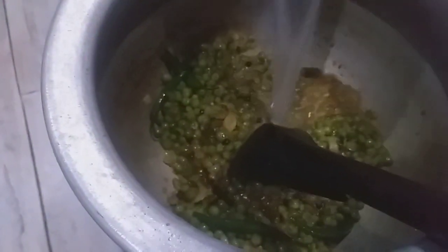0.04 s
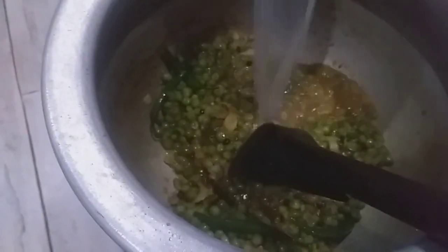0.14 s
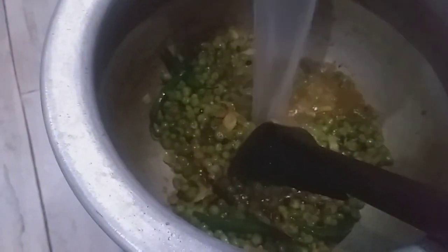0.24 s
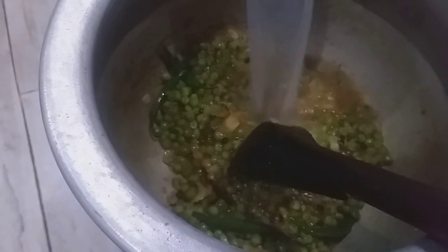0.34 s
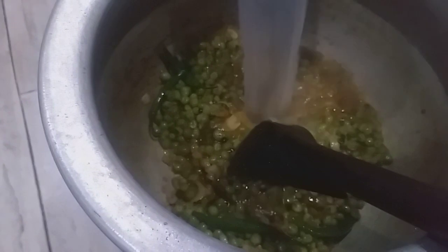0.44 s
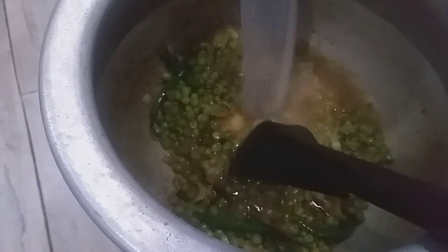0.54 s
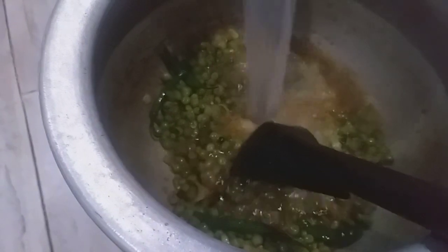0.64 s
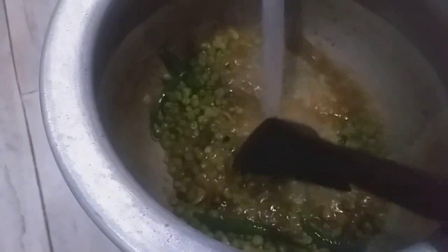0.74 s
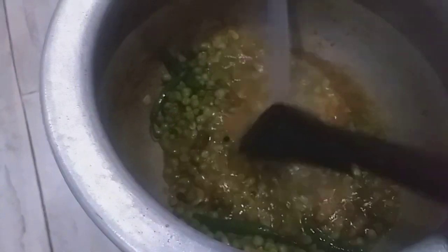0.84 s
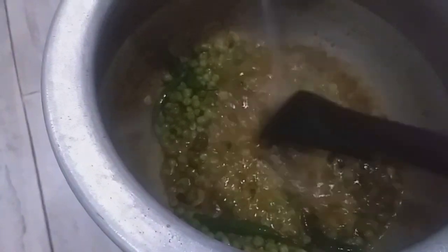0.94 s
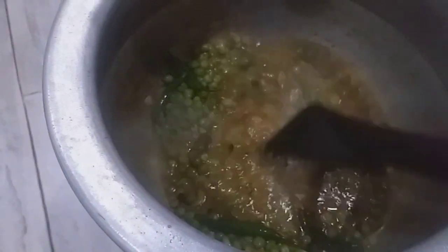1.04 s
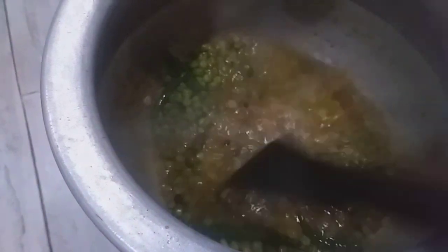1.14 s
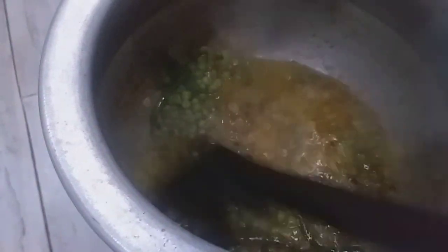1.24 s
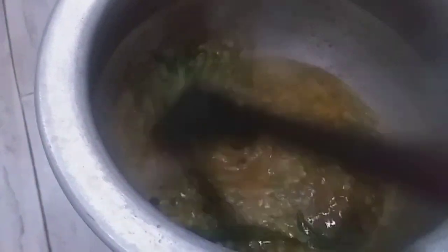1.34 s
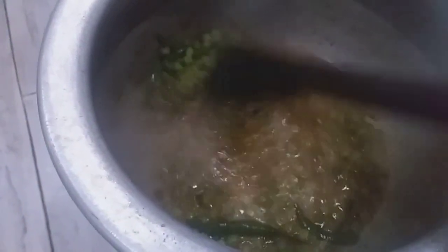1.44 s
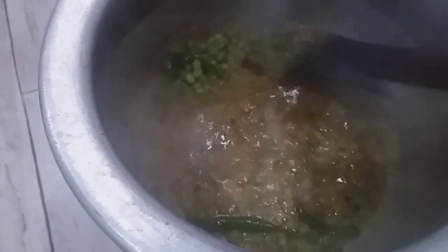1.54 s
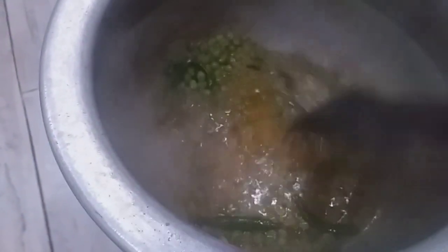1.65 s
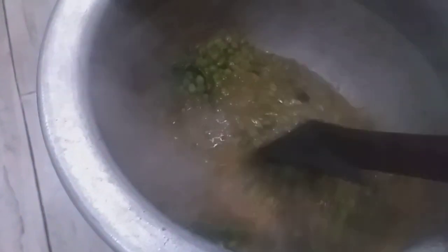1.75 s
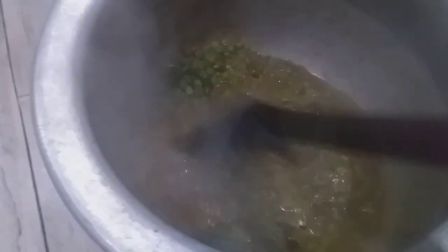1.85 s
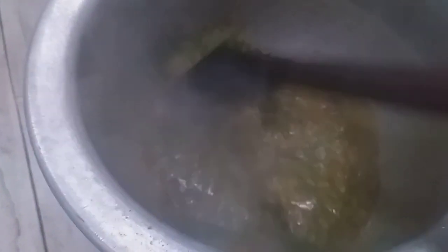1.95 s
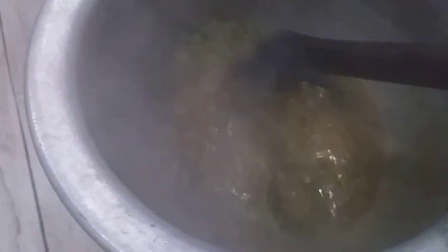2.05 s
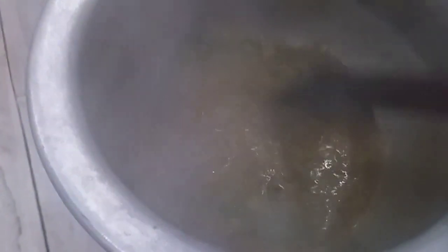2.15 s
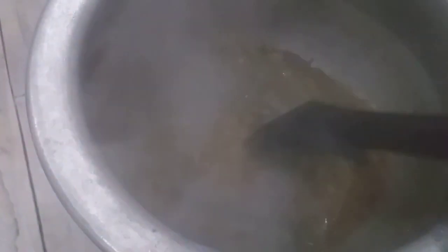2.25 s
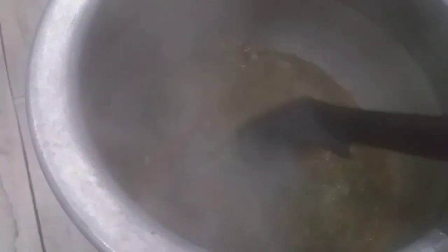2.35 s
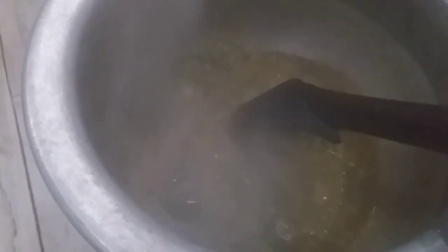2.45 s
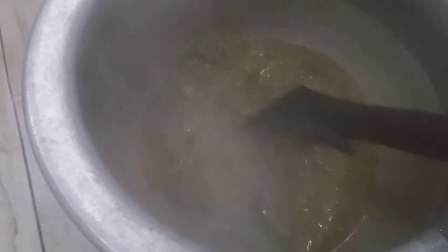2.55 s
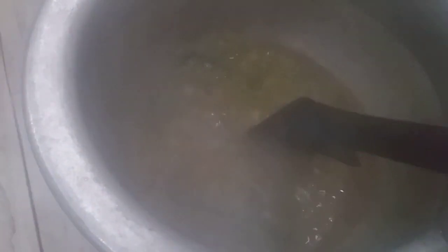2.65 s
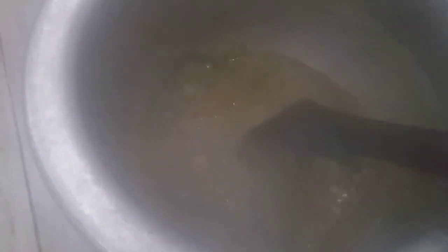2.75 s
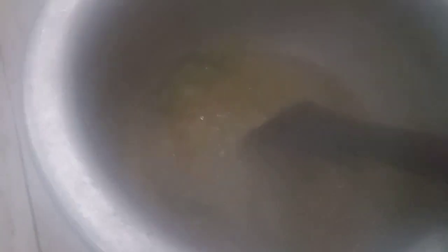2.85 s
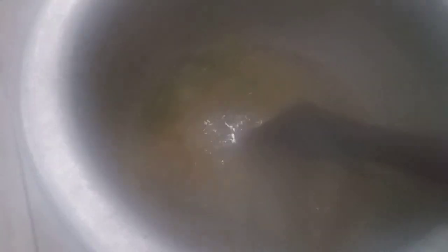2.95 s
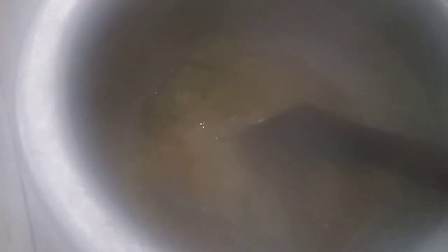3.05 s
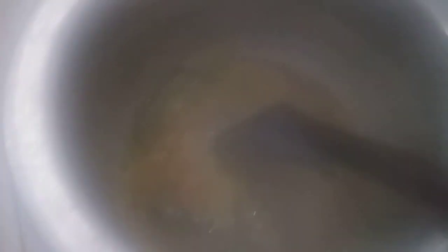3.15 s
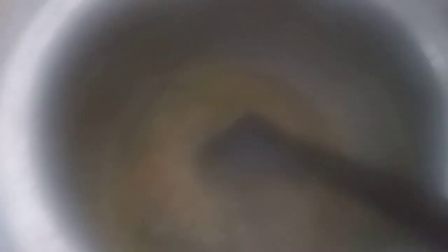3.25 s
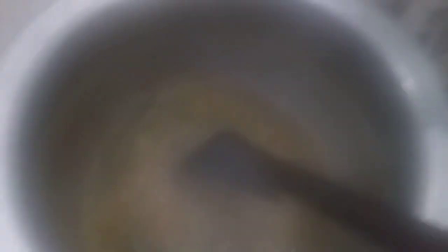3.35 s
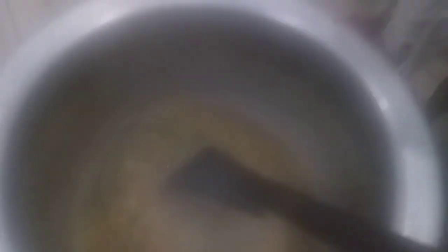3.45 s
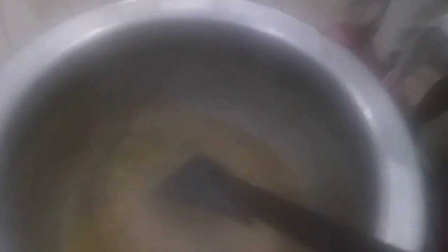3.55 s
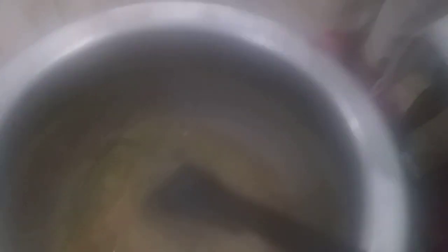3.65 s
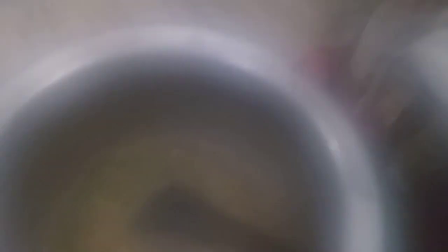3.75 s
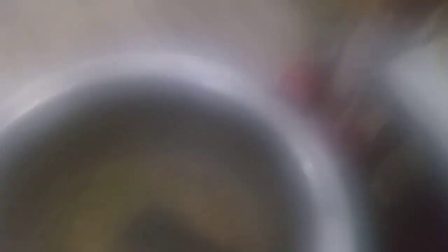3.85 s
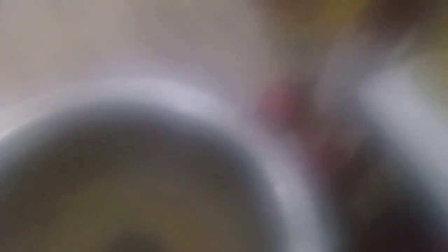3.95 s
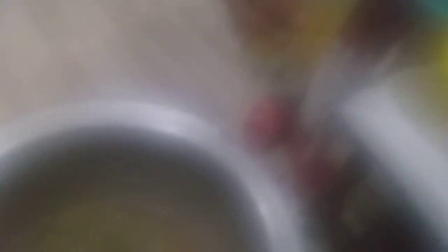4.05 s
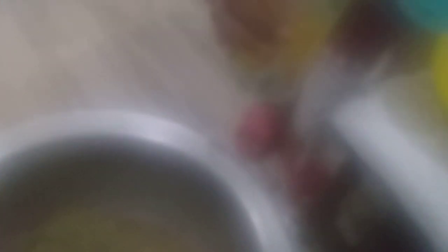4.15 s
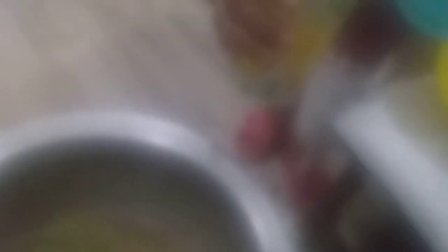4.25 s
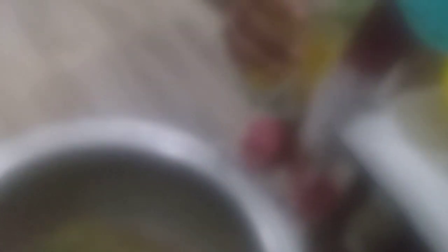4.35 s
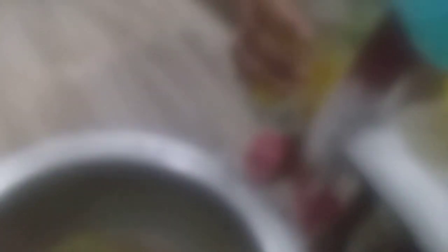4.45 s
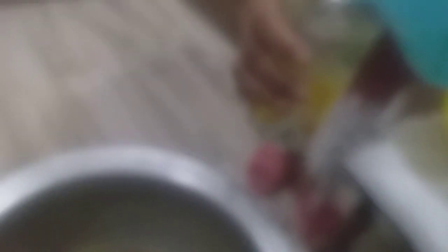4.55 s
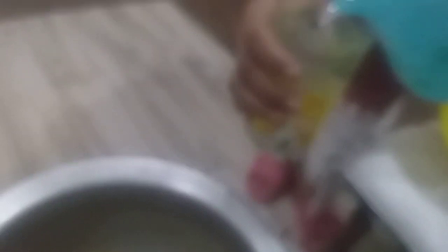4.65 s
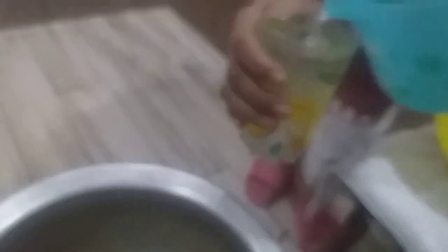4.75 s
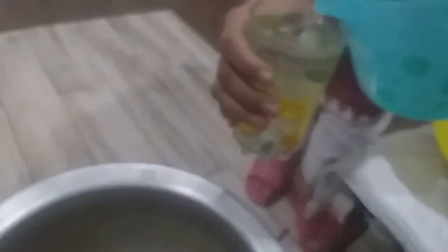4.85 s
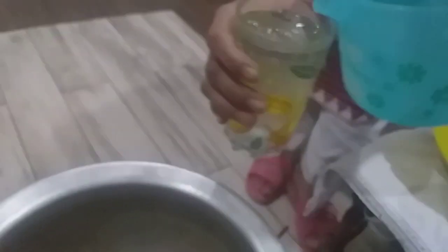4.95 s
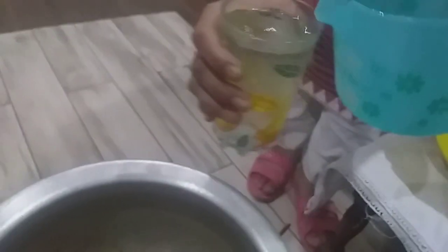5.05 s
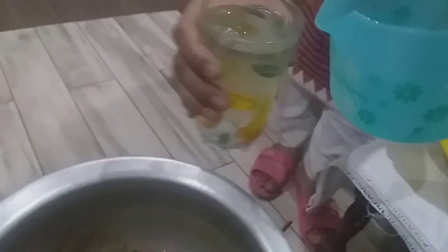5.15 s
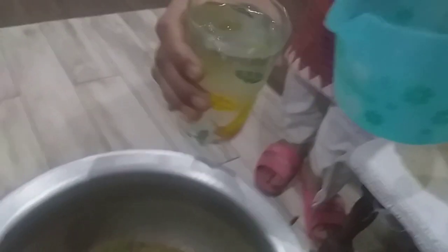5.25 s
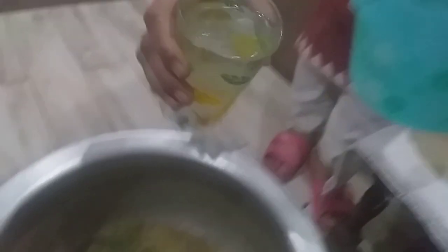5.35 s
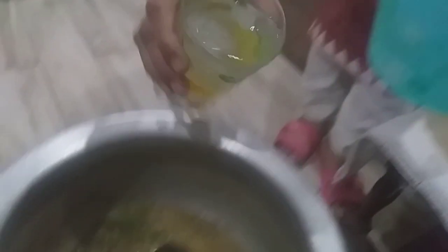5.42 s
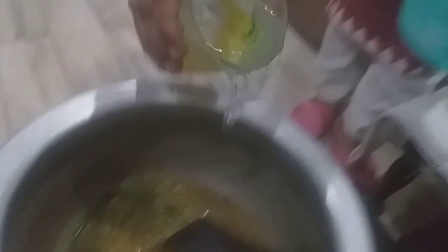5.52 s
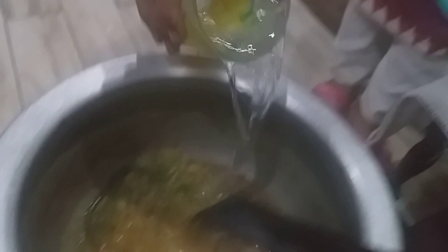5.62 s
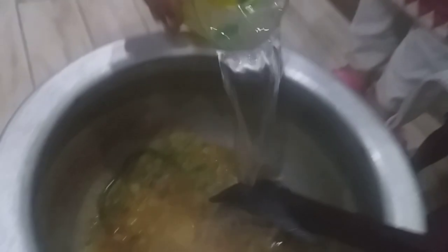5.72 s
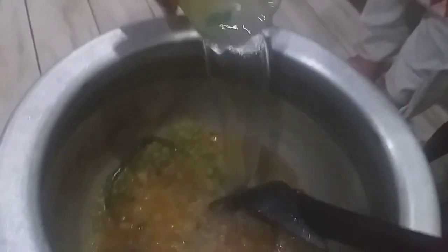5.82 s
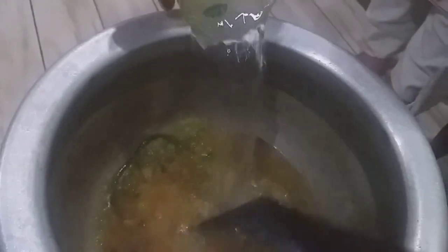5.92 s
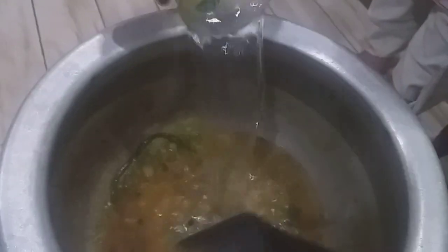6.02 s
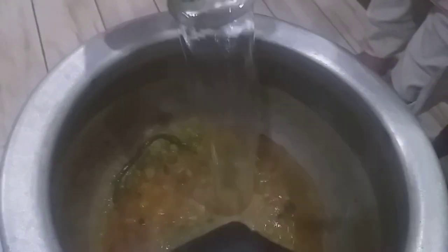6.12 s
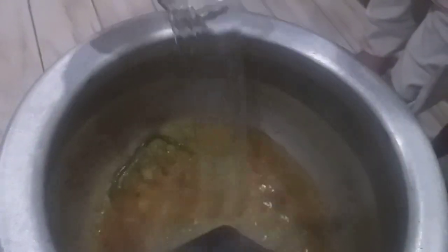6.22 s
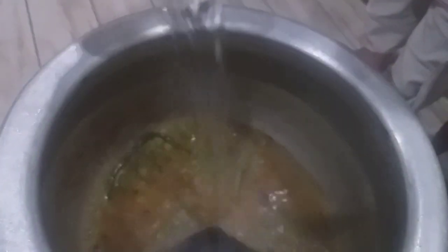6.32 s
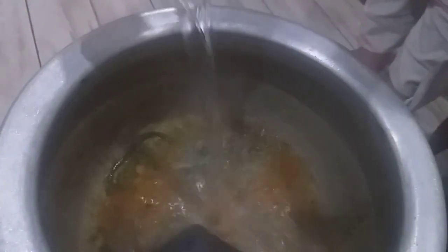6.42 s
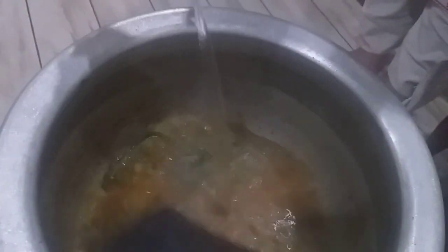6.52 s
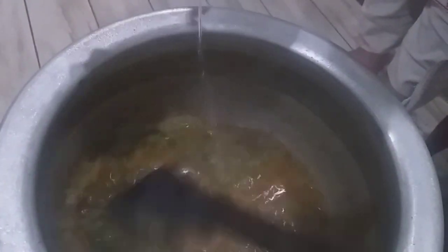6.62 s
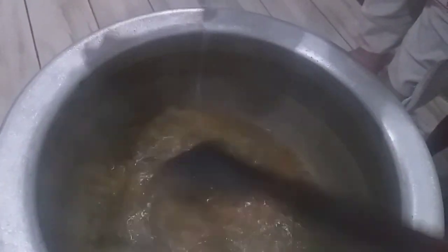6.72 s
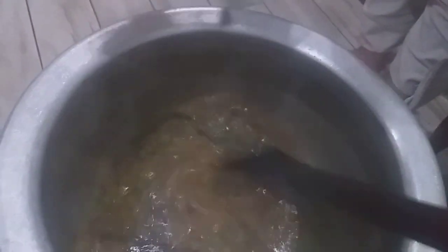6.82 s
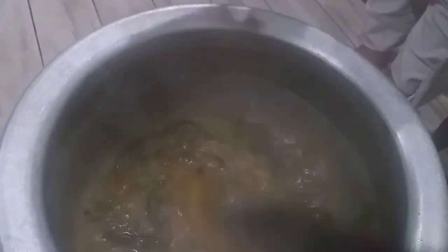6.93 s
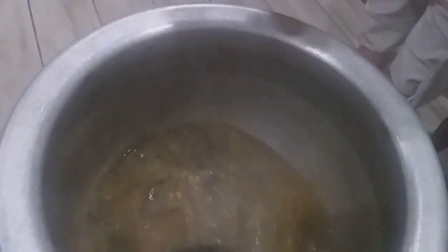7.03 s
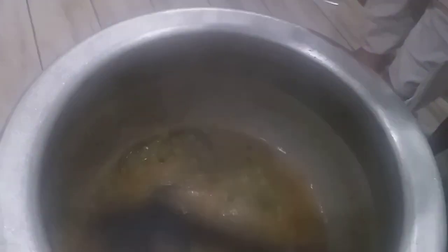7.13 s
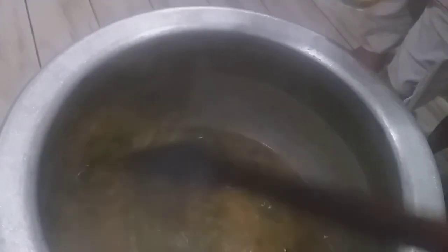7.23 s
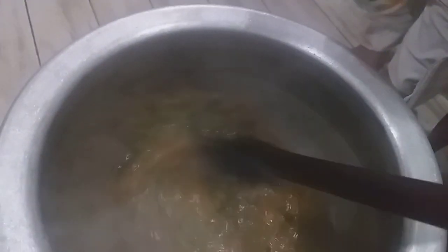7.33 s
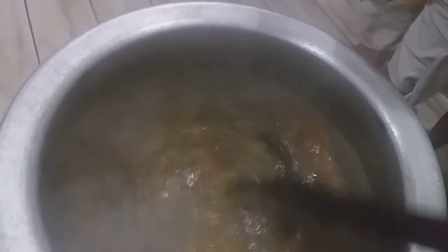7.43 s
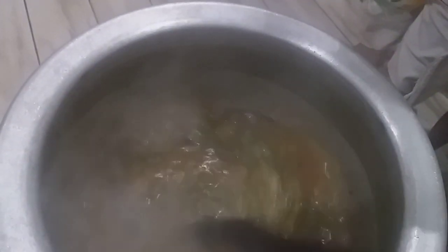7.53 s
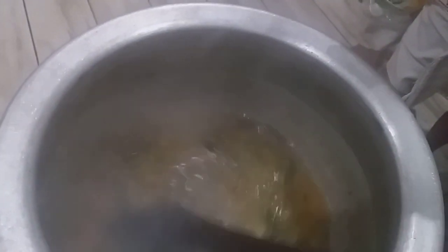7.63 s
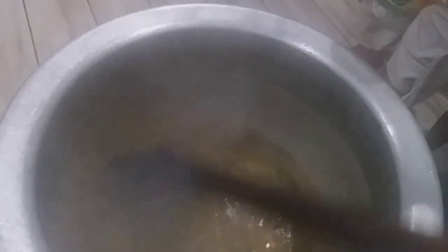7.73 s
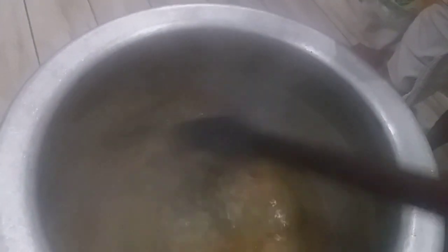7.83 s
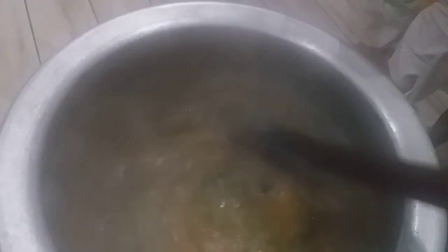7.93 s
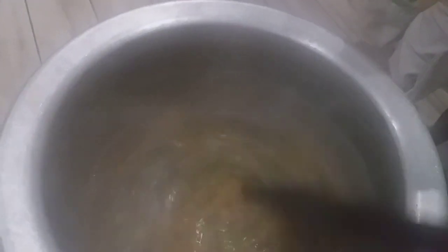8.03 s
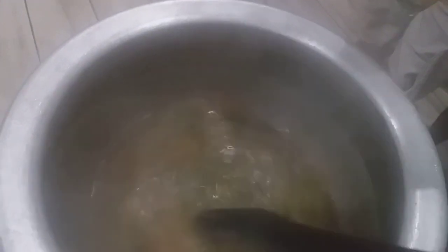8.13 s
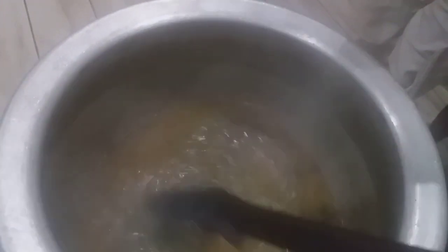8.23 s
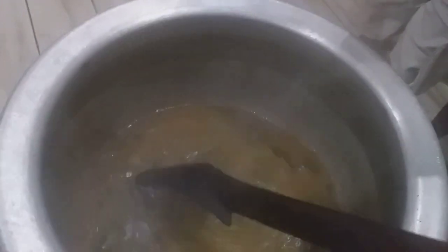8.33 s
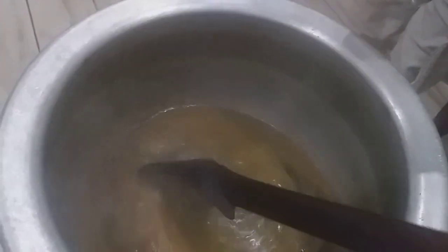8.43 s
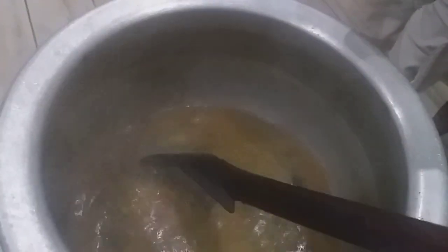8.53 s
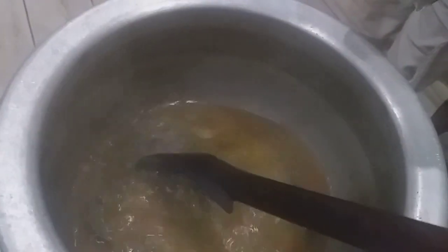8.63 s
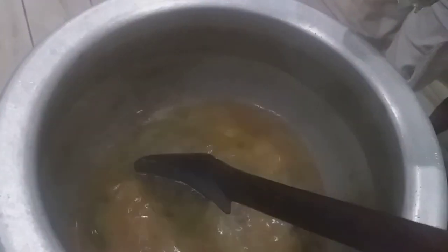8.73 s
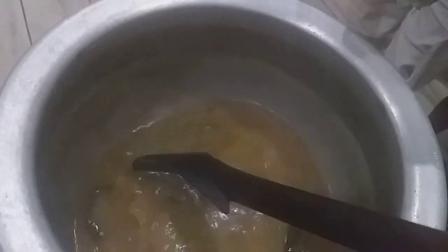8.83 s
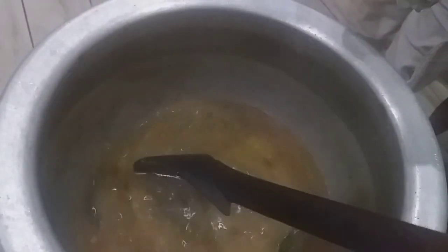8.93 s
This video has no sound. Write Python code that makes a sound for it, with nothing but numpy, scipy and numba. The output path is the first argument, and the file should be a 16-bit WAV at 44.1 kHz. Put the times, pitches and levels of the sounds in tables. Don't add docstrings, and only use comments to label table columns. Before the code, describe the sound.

Dense fizzing steam rises over hot metal, with a few bright droplet ticks, thick gurgles and dull wooden knocks on the pot wall. It subsides to a quiet simmer for a couple of seconds, then more water brings a broad hiss and three short bursts with stirred glugs, and falls nearly silent. Close small microphone, brittle treble, indoor room, hollow pot resonance.

```python
import sys
import numpy as np
from scipy import signal
from scipy.fft import rfft, irfft, next_fast_len
from scipy.io import wavfile
from numba import njit

SR = 44100
rng = np.random.default_rng(int(sys.argv[2]) if len(sys.argv) > 2 else 0)


def dump(signal):
    limited = np.clip(np.atleast_2d(signal).T, -1, 1)
    pcm = np.round(limited * 32767).astype(np.int16)
    wavfile.write(sys.argv[1], SR, pcm)


def amplitude_ratio(level_db):
    exponent = np.asarray(level_db, float) / 20
    return 10 ** exponent


N = 396018
STEP = 64


def fizz():
    # [t/s, vigour level/dB, fineness of the bursts/dB]
    heat = [(0, -35.5, 1.5), (.15, -32.5, -0.5), (.7, -30.5, -2.5), (.95, -28, 0), (1.2, -26.5, -0.5),
            (1.45, -25.5, 1.5), (1.8, -26.5, -2), (2.03, -27, 3.5), (2.36, -31.5, -1), (2.52, -32, 0.5),
            (2.73, -36.5, -1), (3.15, -39, -5.5), (3.6, -42, -7), (4.6, -45, -7), (5.65, -45, -5.5),
            (8.0, -39.5, 10), (8.3, -47, 5), (8.98, -59, 10)]
    # [level at mean heat/dB, share of heat swing, share of fineness,
    # loss once drowned/(dB/s)]
    sizes = [(-47, 0.7, 0.01, 3), (-40.5, 0.74, 0.01, 1), (-41, 0.92, 0.09, 8), (-36.5, 1.07, .01, -6),
             (-40.5, 0.99, 0.39, 12), (-26, 1.15, 0.85, .1)]
    # [level re peak/dB, climb/(dB/s), share of fall, share of coarse extra, lag/s]
    wave_answers = [(-14, 5, 0.49, .99, 0.025), (-9, 15, 1.08, 0.76, 0.0045), (-11, 18, 1.2, 0.22, .003),
                    (-0.9, 19, 1.18, .01, 0.0016), (-6, 18, 0.94, 0.28, 0.014), (12.5, 45, 1.9, 0.24, .025)]
    # [t/s, fine level/dB, coarse level/dB, length/s]
    puffs = [(0.0, 3, 0.5, .04), (.3, 2.5, .1, 0.026), (0.426, 3.5, -3, 0.0087), (0.481, 5, -1, 0.0066),
             (0.556, 1, .1, .015), (.72, 0.5, -2.5, .02), (.9, -2, -2, .03), (1.113, -0.5, -1.5, .03),
             (1.19, -1.5, 1, .02), (1.27, -3.5, 1.5, .03), (1.395, 1, 1.5, .02), (1.62, 1, 2, 0.058),
             (1.873, 1.5, 4, .012), (1.91, -2, 3.5, .012), (1.96, -1.5, -0.5, .02), (2.37, -0.5, -3, .015),
             (5.794, -2.5, -3, .02), (5.85, 0, -4, .015), (6.12, 0, 0, .02), (6.243, 1, 2.5, 0.039),
             (6.416, -2, -1.5, 0.027), (6.6, -1.5, 2, 0.015), (6.893, 2, 4, 0.089), (7.076, 0, -3.5, 0.038),
             (7.13, 0.5, 3, 0.062), (7.347, -0.5, -4, 0.028), (7.584, 2, 1.5, 0.056),
             (7.85, -0.5, 1.5, .04), (8.2, -3, 2, .015)]
    coarseness = [1, 1, .5, 0, 0, 0]
    size_edges = [650, 1250, 2400, 3400, 6500, 10500, 1e6]
    # [f/Hz, level/dB per Hz]
    fizz_colour = [(500, -5), (800, -15), (1000, -14.5), (1270, -17), (1540, -11), (3000, -7.5),
                   (3650, -3.5), (4150, 3.5), (4700, 2), (9800, -21), (11700, -5.5), (12900, -3),
                   (14500, 10.5), (15000, 13.5)]
    mean_heat_db = -35
    drowned_s = 7.98
    calm_flicker, flicker_per_db = 0.35, 0.8

    t = control_times()
    heat_db, fineness_db = in_time(heat)
    fine_puff_db = coarse_puff_db = 0
    for s, fine_db, coarse_db, length in puffs:
        puff = np.exp(-((t - s) / length) ** 2)
        fine_puff_db = fine_puff_db + fine_db * puff
        coarse_puff_db = coarse_puff_db + coarse_db * puff

    levels_db = []
    for (db, follows, fine_share, loss), answer, coarse in zip(sizes, wave_answers, coarseness):
        steady_db = db + follows * (heat_db - mean_heat_db) + fine_share * fineness_db
        level_db = power_sum(steady_db, *waves(*answer))
        level_db = level_db - loss * np.maximum(t - drowned_s, 0)
        levels_db.append(level_db + coarse * coarse_puff_db + (1 - coarse) * fine_puff_db)

    unrest = each_sample(np.clip(1 + flicker_per_db * (levels_db[3] - mean_heat_db), calm_flicker, 1))
    gust_db = 0.43 * drift(1.7) + 0.33 * drift(52)
    bursts = rms_one(grains(9000, spread_db=2.5)) + 1.08 * rng.standard_normal(N)
    bursts = cross_air(bursts)
    flickers_db = [1.3, 0.98, 1.5, 1.16, 0.91, 1.0]
    out = 0
    for level_db, low, high, flicker_db in zip(levels_db, size_edges, size_edges[1:], flickers_db):
        patches = amplitude_ratio(gust_db + flicker_db * unrest * drift(4.5) + 0.71 * drift(54))
        band = rms_one(patches * coloured(bursts, fizz_colour, low, high))
        out = out + amplitude_ratio(each_sample(level_db)) * band
    return out


def waves(re_db, climb, fall_share, coarse_share, lag):
    # [start t/s, peak t/s, peak level/dB, fall/(dB/s), extra level of coarse bursts/dB]
    washes = [
        (5.724, 5.96, -32.5, 15, 3),
        (6.572, 6.737, -24.5, 56, -6.5),
        (7.083, 7.315, -24.5, 51.5, 0.3),
        (7.742, 7.812, -26.5, 54, -1.7),
    ]
    attack_db_per_s = 288
    t = control_times() - lag
    levels_db = []
    for start, peak, peak_db, fall, coarse_db in washes:
        level_db = peak_db + re_db + coarse_share * coarse_db
        level_db = level_db - attack_db_per_s * np.maximum(start - t, 0)
        level_db = level_db - climb * np.maximum(peak - t, 0)
        levels_db.append(level_db - fall_share * fall * np.maximum(t - peak, 0))
    return levels_db


def boil():
    # [t/s, level/dB]
    boiling = [(0, -44), (.7, -44.5), (1.02, -42.5), (1.3, -39), (1.85, -37.5), (1.97, -39.5), (2.9, -45.5),
               (3.5, -47.5), (4.6, -50.5), (5.5, -52), (5.95, -43), (6.43, -47), (6.65, -41), (7.0, -45),
               (8.1, -44), (8.2, -57), (8.48, -56), (8.98, -75)]
    # [f/Hz, level/dB per Hz]
    slosh_colour = [(15, -67), (25, -29), (220, 3), (300, -9), (390, -31), (660, -120)]
    slosh_base_db, slosh_follows = -65, 1
    glug_base_db, glug_follows = -56.5, 1.5
    stir_simmer_db = -8
    glug_drowned_s, glug_loss_db_per_s = 8.3, 64

    (boil_db,) = in_time(boiling)
    stirred_glug_db, stirred_slosh_db = stirring()
    swing_db = boil_db + 45
    slosh_db = each_sample(power_sum(slosh_base_db + slosh_follows * swing_db, stirred_slosh_db))
    glug_db = each_sample(power_sum(glug_base_db + glug_follows * swing_db, stirred_glug_db))
    glug_db = glug_db - np.clip(glug_loss_db_per_s * (np.arange(N) / SR - glug_drowned_s), 0, 9)
    simmer_db = each_sample(power_sum(boil_db, stir_simmer_db + stirred_glug_db))

    slosh = coloured(rng.standard_normal(N) * amplitude_ratio(1.5 * drift(20)), slosh_colour, high=218)
    glug = bubbles(250, 248, 330, cycles=11.9)
    simmer = filtered(bubbles(500, 342, 610, cycles=15.3), 2, 320, "high")
    return amplitude_ratio(slosh_db) * slosh + amplitude_ratio(glug_db) * glug + amplitude_ratio(simmer_db) * simmer


def stirring():
    # [t/s, glug level/dB, dying/(dB/s), slosh level/dB]
    turns = [(1.02, -45.5, 60, -57), (1.28, -34, 57, -53), (1.5, -54, 60, -55), (1.6, -46, 60, -57),
             (1.85, -33, 95, -61), (1.95, -53, 92, -50), (2.05, -38, 85, -68), (2.45, -46.5, 45, -59),
             (2.9, -58, 86, -63), (3.07, -43.5, 111, -69), (3.19, -48.5, 44, -59.5), (5.6, -54, 150, -69),
             (6.0, -52, 97, -58), (6.16, -48.5, 33, -64), (6.3, -54, 54, -61), (6.65, -42.5, 121, -54),
             (6.95, -50, 33, -56), (7.07, -46, 42, -55), (7.2, -40.5, 57, -59), (7.33, -38.5, 200, -68),
             (7.5, -45.5, 60, -55), (7.6, -38, 85, -56), (7.9, -42, 30, -56), (8.1, -42.5, 63, -60),
             (8.18, -54, 67, -57), (8.28, -49, 233, -61)]
    rise_db_per_s = 127
    t = control_times()
    glugs_db, sloshes_db = [], []
    for s, glug_db, dying, slosh_db in turns:
        swell_db = -np.maximum(rise_db_per_s * (s - t), dying * (t - s))
        glugs_db.append(glug_db + swell_db)
        sloshes_db.append(slosh_db + swell_db)
    return power_sum(*glugs_db), power_sum(*sloshes_db)


def bubbles(per_s, low_hz, high_hz, cycles):
    pops = grains(per_s, spread_db=1.5)
    dealt = rng.integers(0, 8, N)
    out = 0
    for k, hz in enumerate(np.geomspace(low_hz, high_hz, num=8)):
        out = out + ring(pops * (dealt == k), hz, cycles / hz)
    return rms_one(deep_air(out))


def knocks():
    # [t/s, dull level/dB, low push
    # level/dB, bright level/dB, bright f/Hz]
    blows = [(1.86, -36, -45, -40, 1000), (2.0, -34, -31, -33, 980), (2.079, -47, -49, -53, 990),
             (2.789, -48, -65, -29.5, 1006), (2.82, -50, -65, -33, 840), (3.059, -22, -60, -33, 1050),
             (3.071, -21.5, -30, -31, 990), (3.205, -59, -60, -31.5, 1150), (5.572, -34, -65, -29.5, 1060),
             (5.574, -40, -63, -35, 700), (5.592, -32.5, -65, -31, 1050), (5.61, -46, -65, -39, 1020),
             (6.628, -26.5, -29, -31, 1040), (7.908, -36, -34, -45, 1010), (8.047, -29, -35, -48, 1010),
             (8.595, -65, -66, -39, 935)]
    # [f/Hz, level/dB, t60/s]
    wall_modes = [(352, -4, 0.13), (448.3, -6.5, 0.23), (602, -14, 0.067)]
    push_hz, push_t60_s, bright_t60_s = 170, 0.034, 0.067
    crack_db, crack_t60_s, crack_top_hz = -5, 0.014, 1900

    rings, pushes = np.zeros(N), np.zeros(N)
    u = np.arange(SR // 4) / SR
    luck_db = rng.normal(0, 1.3, (len(blows), len(wall_modes)))
    cracks = rms_one(filtered(rng.standard_normal((len(blows), len(u))), 2, crack_top_hz, "low"))
    for (s, dull_db, push_db, bright_db, bright_hz), lucks, crack in zip(blows, luck_db, cracks):
        modes = [(hz, dull_db + level_db + luck, t60) for (hz, level_db, t60), luck in zip(wall_modes, lucks)]
        modes += [(bright_hz, bright_db, bright_t60_s), (2.5 * bright_hz, bright_db - 18, 0.03)]
        at = slice(int(s * SR), int(s * SR) + len(u))
        for hz, level_db, t60 in modes:
            rings[at] += amplitude_ratio(level_db - 60 * u / t60) * np.sin(2 * np.pi * hz * u)
        rings[at] += amplitude_ratio(bright_db + crack_db - 60 * u / crack_t60_s) * crack
        pushes[at] += amplitude_ratio(push_db - 60 * u / push_t60_s) * np.sin(2 * np.pi * push_hz * u)
    return filtered(rings, 2, 280, "high") + pushes


def drops():
    # [t/s, peak level/dB, start f/Hz, rise/octaves, length/s]
    plinks = [(0.417, -20, 3870, 0.34, 0.006), (.521, -14.5, 4130, 0.48, 0.0022),
              (0.559, -16, 4080, 0.36, 0.0039), (5.712, -30, 1570, .1, 0.0076),
              (5.732, -25, 1630, 0.064, 0.0068), (5.733, -23.5, 2240, 0.027, 0.0089),
              (5.731, -27, 3200, 0.017, 0.0034), (5.712, -33, 1950, .05, 0.0036),
              (5.752, -21, 3800, 0.56, 0.0025), (5.7692, -18, 3830, 0.093, 0.0018),
              (5.772, -24, 3970, .1, .002), (5.783, -15, 3080, 0.45, 0.0013), (5.85, -28, 4470, .1, .003),
              (8.208, -37, 2180, 0.016667, .008), (8.428, -40, 2140, .05, .01),
              (8.507, -37, 2180, .02, 0.007), (8.557, -34, 2450, 0.35, 0.005),
              (8.5615, -32, 3150, 0.45, 0.009)]
    splash_db = -7
    landings = [*plinks, *plop()]
    out = np.zeros(N)
    sprays = rms_one(filtered(rng.standard_normal((len(landings), SR // 20)), 4, [1300, 6000], "band"))
    for (s, peak_db, start_hz, rise, length), spray in zip(landings, sprays):
        u = np.arange(int(length * SR)) / (length * SR)
        phase = 2 * np.pi * np.cumsum(start_hz * 2 ** (rise * u)) / SR
        shape = np.sin(np.pi * u ** 0.6)
        flick = amplitude_ratio(splash_db - 40 * u) * spray[-len(u):]
        flick = flick * (start_hz > 1000)
        out[int(s * SR):int(s * SR) + len(u)] += amplitude_ratio(peak_db) * (shape * np.sin(phase) + flick)
    return out


def plop():
    echo_lags = [.02, .032, .043, .068, .085, .098, .115, .155]
    plop_s, rise = 8.595, 0.018
    echo_db, echo_loss_db_per_s = -32, 190
    rows = [(plop_s, -27.5, 826, rise, 0.018)]
    for lag in echo_lags:
        rows.append((plop_s + lag, echo_db - echo_loss_db_per_s * lag, 845, rise, 0.014))
    return rows


def deep_air(x):
    # [f/Hz, width/Hz, level/dB]
    air_modes = [(351, 25, 13.5), (383.4, 29, 22.5), (437, 32, 24.5)]
    return x + sum(amplitude_ratio(gain_db) * resonance(x, hz, width) for hz, width, gain_db in air_modes)


def cross_air(x):
    # [t/s, first f/Hz, second f/Hz, higher modes level/dB]
    cross_modes = [(0, 986, 1480, 0), (.35, 937, 1516, -13), (1.3, 1006, 1503, -16), (1.9, 997, 1582, -10),
                   (2.8, 962, 1563, -9.5), (5.3, 995, 1490, -16), (5.65, 990, 1590, -2),
                   (5.75, 867, 1485, -14), (6.15, 957, 1480, 0), (6.5, 980, 1560, 0.5),
                   (7.1, 997, 1430, -1.5), (7.5, 1010, 1530, 0.5), (7.9, 1003, 1506, -2),
                   (8.3, 960, 1526, -5), (8.98, 940, 1500, -10)]
    # [f/Hz, width/Hz, level/dB]
    higher_modes = [(1806, 120, 2), (2030, 52, 1), (2516, 160, -6.5), (3054, 34, -12.5)]
    first_hz, second_hz, higher_db = map(each_sample, in_time(cross_modes))
    out = x.copy()
    for hz, width, gain_db in [(first_hz, 70, 10), (second_hz, 32, 4)]:
        out += amplitude_ratio(gain_db + 0.97 * drift(5.9)) * resonance(x, hz, width)
    for hz, width, gain_db in higher_modes:
        stirred_db = 2.5 * drift(3.0)
        moving_hz = hz * (1 + 0.012 * drift(1.1))
        out += amplitude_ratio(gain_db + higher_db + stirred_db) * resonance(x, moving_hz, width)
    return out


@njit
def moving_resonance(x, cosine, r):
    y = np.zeros(len(x))
    for i in range(2, len(x)):
        drive = (1 - r * r) / 2 * (x[i] - x[i - 2])
        y[i] = drive + 2 * r * cosine[i] * y[i - 1] - r * r * y[i - 2]
    return y


def resonance(x, hz, width):
    cosine = np.cos(2 * np.pi * hz / SR) + np.zeros(N)
    return moving_resonance(x, cosine, np.exp(-np.pi * width / SR))


def room():
    # [f/Hz, level/dB per Hz]
    room_colour = [(15, -53), (25, -31), (81, 4.5), (185, 3.5), (227, -20), (260, -2), (340, -12),
                   (570, -120)]
    room_db, side_db = -68.5, -27
    mid, side = [amplitude_ratio(room_db) * coloured(white, room_colour) for white in rng.standard_normal((2, N))]
    return mid + amplitude_ratio(side_db) * side * [[1], [-1]]


def rms_one(x):
    return x / np.sqrt(np.mean(x ** 2) + 1e-20)


def filtered(x, order, hz, kind):
    return signal.sosfilt(signal.butter(order, hz, kind, fs=SR, output="sos"), x)


def control_times():
    return np.arange(0, N, STEP) / SR


def in_time(rows):
    s, *columns = np.transpose(rows)
    return [np.interp(control_times(), s, c) for c in columns]


def each_sample(control):
    return np.interp(np.arange(N) / STEP, np.arange(len(control)), control)


def power_sum(*levels_db):
    return 10 * np.log10(sum(amplitude_ratio(2 * db) for db in levels_db))


def drift(rate):
    r = np.exp(-80 * np.pi * rate / SR)
    slow = signal.lfilter([1], [1, -2 * r, r * r], rng.standard_normal(N // 40 + 2002))[2000:]
    return np.interp(np.arange(N) / 40, np.arange(len(slow)), rms_one(slow))


def grains(per_s, spread_db):
    heights = amplitude_ratio(spread_db * np.minimum(rng.exponential(1, N), 5))
    return heights * rng.choice([-1, 1], N) * (rng.random(N) < per_s / SR)


def ring(clicks, hz, t60):
    r, w = amplitude_ratio(-60 / (t60 * SR)), 2 * np.pi * hz / SR
    return signal.lfilter([0, np.sin(w)], [1, -2 * r * np.cos(w), r * r], clicks + 1e-18)


def coloured(x, points, low=0, high=1e6):
    size = next_fast_len(N + SR // 4)
    hz = np.arange(size // 2 + 1) * SR / size + 1
    point_hz, point_db = np.transpose(points)
    gain = amplitude_ratio(np.interp(np.log(hz), np.log(point_hz), point_db))
    gain = gain / np.sqrt((1 + (low / hz) ** 12) * (1 + (hz / high) ** 12))
    return rms_one(irfft(rfft(x, size) * gain, size)[:N])


def scene():
    near = fizz() + boil() + knocks() + drops()
    near = filtered(near, 2, 142, "high")
    return near + room()


def band_limit(x):
    return signal.sosfilt(signal.butter(12, 17100, fs=SR, output="sos"), x)


def record(dry):
    # [low f/Hz, high f/Hz, level/dB]
    leaning = [(1550, 2420, -13.5), (9500, 10000, -15)]
    top_hz = 15730
    size = next_fast_len(N + SR // 4)
    hz = np.arange(size // 2 + 1) * SR / size + 1
    (soft_low, soft_high, soft_db), (hard_low, hard_high, hard_db) = leaning
    lean = amplitude_ratio(soft_db) / (1 + (soft_low / hz) ** 14) / (1 + (hz / soft_high) ** 14)
    lean = lean + amplitude_ratio(hard_db) * (hz > hard_low) * (hz < hard_high)
    spectrum = rfft(dry, size) * (1 + lean * [[1], [-1]]) * (hz < top_hz)
    return band_limit(irfft(spectrum, size)[:, :N])


dry = scene()
out = record(dry)
dump(out)
```